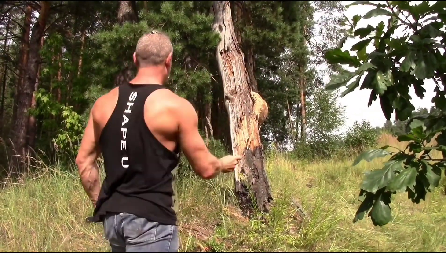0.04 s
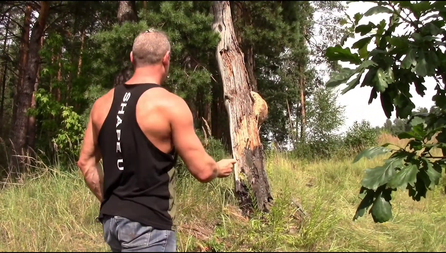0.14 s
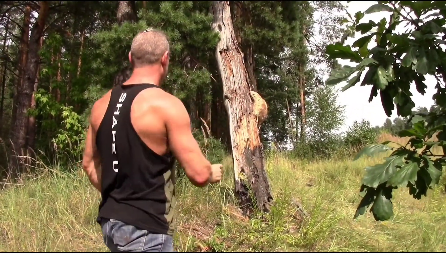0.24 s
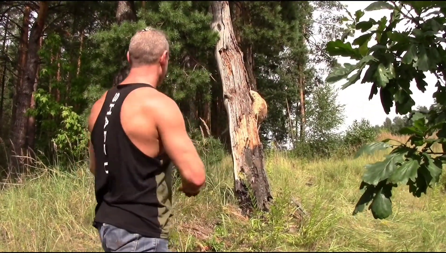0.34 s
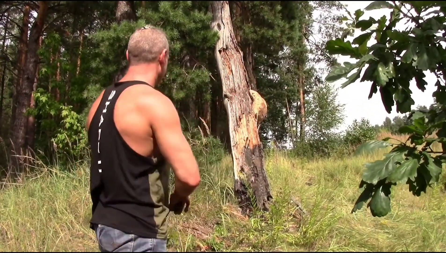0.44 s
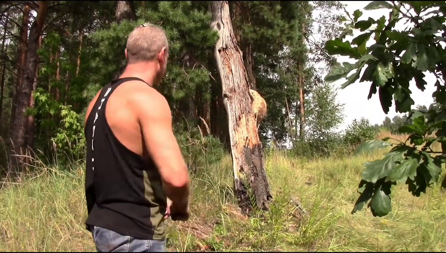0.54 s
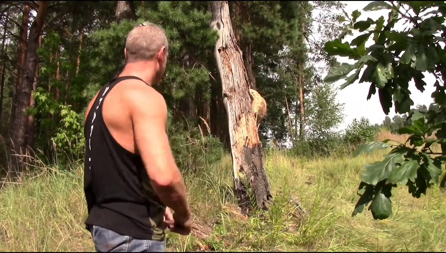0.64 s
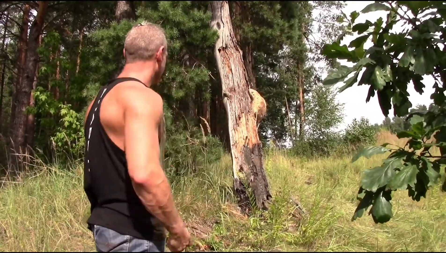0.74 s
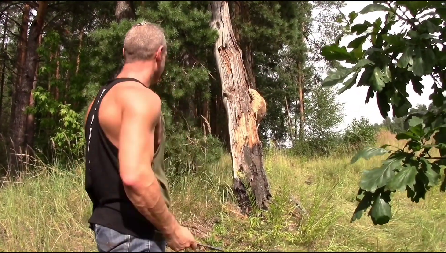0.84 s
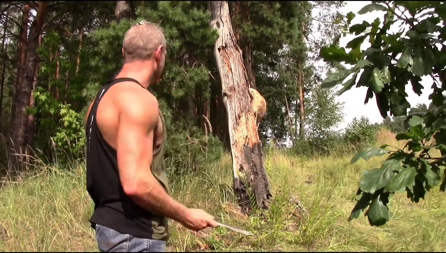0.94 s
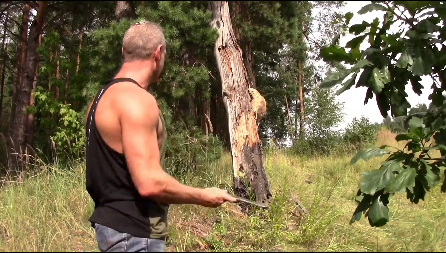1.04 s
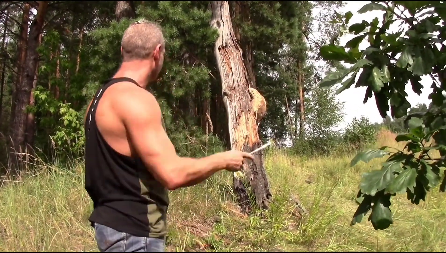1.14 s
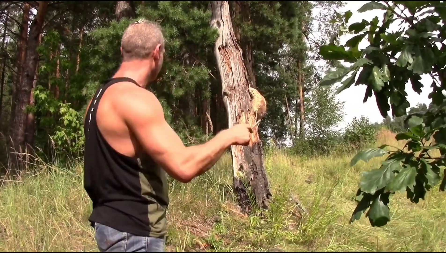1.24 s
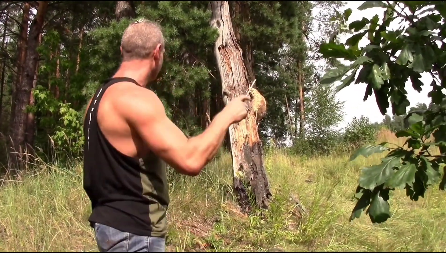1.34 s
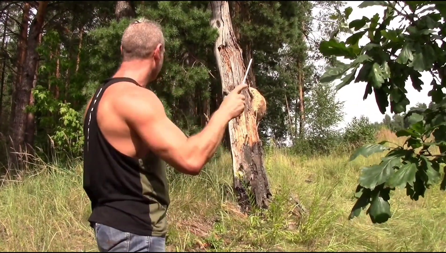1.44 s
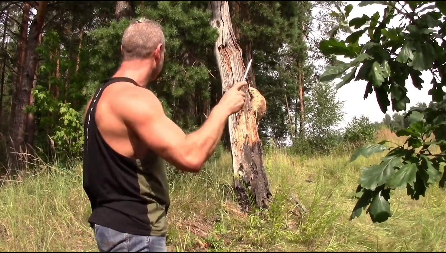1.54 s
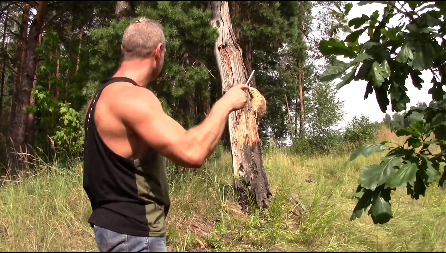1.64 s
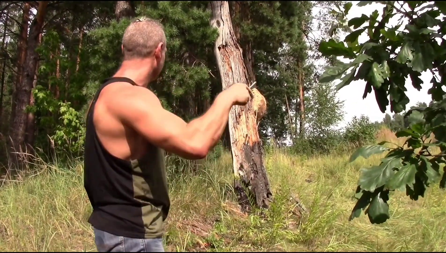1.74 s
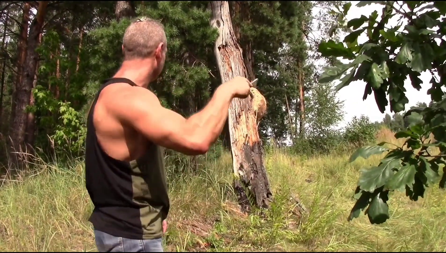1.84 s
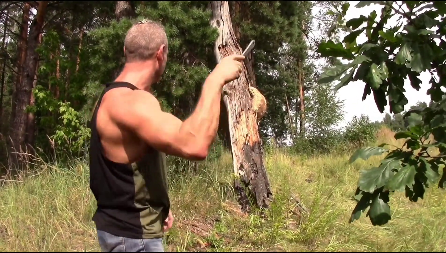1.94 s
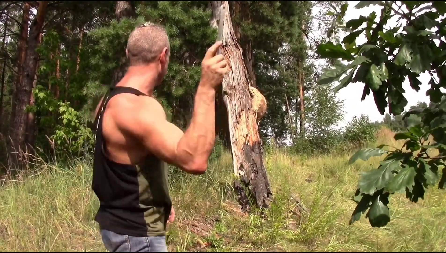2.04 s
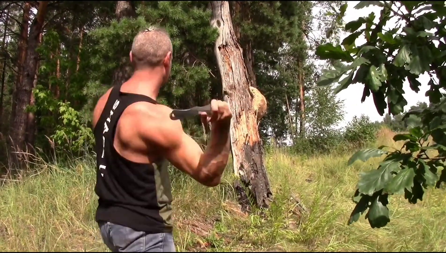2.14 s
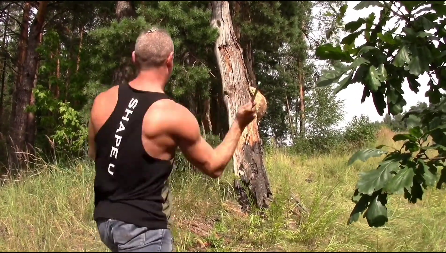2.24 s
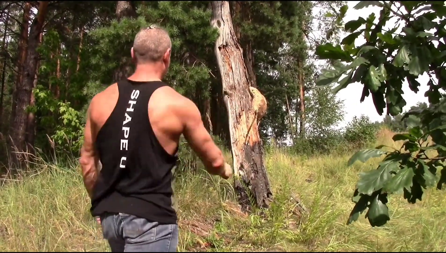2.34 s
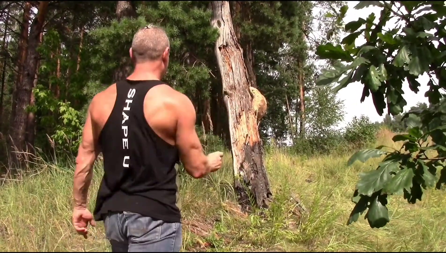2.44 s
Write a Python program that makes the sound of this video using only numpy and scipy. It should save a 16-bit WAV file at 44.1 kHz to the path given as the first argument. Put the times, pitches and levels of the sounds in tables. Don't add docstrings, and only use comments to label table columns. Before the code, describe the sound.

Brief blade ring at release, then a hard knife hit in dry wood with splitting fibres and slight tree echo; later clicking, knocking sheath draw, soft cloth and grass movement, outdoors in light wind, closely miked.

```python
import sys
import numpy as np
from scipy import signal
from scipy.fft import rfft, irfft
from scipy.io import wavfile
from scipy.ndimage import uniform_filter1d

SR = 44100
rng = np.random.default_rng(int(sys.argv[2]) if len(sys.argv) > 2 else 0)


def rack_gain(trim_db):
    fader = np.asarray(trim_db, float)
    return 10 ** (fader / 20)


def file_out(sig):
    cols = np.atleast_2d(sig).T
    lim = np.clip(cols, -1, 1)
    pcm = np.round(lim * 32767).astype(np.int16)
    wavfile.write(sys.argv[1], SR, pcm)


N = 110250

# frequency in Hz, level in dB per Hz.
WIND_COLOUR = [(30, -28), (70, -16), (220, -6.5), (400, -4.5), (850, -11), (1600, -20.5), (4000, -29.5),
               (7600, -29.5), (10500, -36.5), (15600, -38)]
# time in seconds, level in dB.
WIND_GUSTS = [
    (0.0, -50),
    (0.668, -51.5),
    (0.87, -52.5),
    (1.93, -57),
    (2.18, -55),
    (2.4, -56.5),
    (2.5, -54.5),
]
# frequency in Hz, side over mid in dB.
WIND_WIDTH = [(30, -14), (180, -14), (550, -16.5), (1650, -8.5), (4000, -5), (6000, -16), (8000, -5.5),
              (13000, -5.5), (14800, -10)]
# frequency in Hz, decay by 60 dB in seconds.
TREES_DECAY = [(150, 0.25), (400, 0.3), (800, 0.32), (1200, 0.49), (2000, 0.34), (3500, 0.21), (8000, 0.12)]
# frequency in Hz, level in dB.
TREES_COLOUR = [(200, -16), (400, -7), (800, -15.5), (1150, -22), (1600, -17), (2500, -23.5), (4000, -16),
                (8000, -7.5)]
# delay in seconds, level in dB.
TRUNK_ECHOES = [
    (.056, -39),
    (0.077, -46.5),
    (0.107, -44.5),
    (.138, -69),
]
# frequency in Hz, side over mid in dB.
NEAR_WIDTH = [(300, -36.5), (1200, -28), (3000, -18.5), (6000, -26), (8200, -13.5), (12000, -20)]
# middle in seconds, half length in seconds, level in dB, low and high edge in Hz.
RUSTLES = [(0.008, .018, -52.5, 400, 2800), (0.105, 0.017, -50, 1300, 3560), (.006, 0.018, -57, 4000, 9500),
           (0.061, .012, -63, 4800, 7500), (0.115, 0.052, -59.5, 3300, 8000),
           (0.416, 0.054, -70, 4530, 11900), (0.419, 0.0075, -58.5, 1880, 2440),
           (0.819, 0.0067, -58, 1200, 2600), (0.52, 0.42, -68, 4300, 10400),
           (0.91, 0.24, -67.5, 2980, 7900), (2.072, .04, -63, 4200, 11200),
           (2.176, 0.023, -65.5, 2960, 13700), (2.313, 0.12, -69, 5400, 12400),
           (2.49, 0.043, -59, 900, 8650)]
# time in seconds, level in dB.
LUNGE_SWELL = [
    (2.21, -93),
    (2.228, -58),
    (2.26, -45.5),
    (2.36, -53),
    (2.41, -53.5),
    (2.455, -53),
    (2.5, -53),
]
# time in seconds, level in dB, pitch in Hz, width in Hz.
TICKS = [(.0125, -43, 585, 252), (0.0143, -51.5, 1820, 400), (0.0969, -42.5, 347, 200),
         (0.1038, -40, 1210, 350), (.1085, -43, 780, 300), (0.1143, -50, 358, 250),
         (0.4225, -36.5, 7600, 6000), (0.43, -39.5, 6940, 4960), (.512, -42, 7700, 5000),
         (0.559, -45, 7260, 6130), (0.575, -44.5, 7850, 6000), (0.6594, -37.5, 2600, 4030),
         (0.6584, -30.5, 5600, 8000), (0.685, -46, 10900, 5030), (0.7173, -34.5, 6500, 7000),
         (.7175, -45, 12500, 7000), (0.728, -35, 6700, 6000), (0.7393, -37, 11000, 8000),
         (0.7422, -42, 4000, 6000), (0.756, -28.5, 6370, 7000), (0.7473, -35, 10000, 6000),
         (0.7792, -35, 6000, 6000), (.7835, -46, 12400, 7000), (0.7855, -38, 5000, 4000),
         (.7918, -33, 5460, 5000), (.8065, -41, 6000, 5000), (0.8379, -41.5, 7350, 6000),
         (0.9292, -55, 7640, 5000), (1.107, -52, 4900, 3000), (1.218, -44, 2270, 2020),
         (1.926, -46.5, 7760, 7000), (2.153, -43.5, 8000, 8000), (2.153, -46, 500, 350),
         (2.153, -53.5, 2200, 700), (2.153, -54, 12500, 7000), (2.09, -52, 13100, 7000),
         (2.164, -54, 1060, 300), (2.187, -37, 930, 740), (2.186, -47, 1670, 1000), (2.188, -48, 690, 500),
         (2.192, -48, 7000, 4000), (2.253, -52, 604, 900), (2.305, -55, 9800, 4000),
         (2.3185, -53, 12000, 7900)]
# time in seconds, level in dB.
DRAW_SWELL = [
    (.69, -60),
    (.715, -57),
    (.745, -50.5),
    (.768, -47),
    (.785, -46),
    (.81, -54.5),
    (.835, -67),
]
# middle in Hz, width in Hz, level in dB.
SHEATH_BANDS = [(750, 570, -0.5), (1680, 310, -5.5), (2600, 350, -6.5), (5300, 1150, 2), (6060, 1000, 0.5),
                (8800, 3500, 0), (11500, 4300, -3)]
# time in seconds, level in dB.
SHEATH_KNOCKS = [
    (.7168, -34),
    (.7425, -41),
    (.7625, -33.5),
    (.7655, -37),
    (.785, -56),
    (.7895, -34),
    (.8025, -35),
    (.806, -44),
]
# frequency in Hz, level in dB, decay by 60 dB in seconds.
SHEATH_MODES = [(700, -2.5, 0.02), (806, -2, 0.02), (1750, -13.5, 0.021), (2210, -17, 0.032)]
# frequency in Hz, level in dB, decay by 60 dB in seconds.
THROWN_MODES = [(2760, -16, .12), (6191, 0, .06), (8436, -4, .04), (10950, -17, .03), (12500, -28, .025)]
# frequency in Hz, level in dB, decay by 60 dB in seconds.
DRAWN_MODES = [(2800, -17.5, 0.22), (4320, -14, 0.036), (6480, -0.5, 0.18)]
# time in seconds, level in dB, rise in seconds,
# lean toward low modes in dB per octave, time it rings free in seconds.
THROWN_FLICKS = [
    (0.0, -29.5, 0.01, -7.5, .022),
    (0.056, -46.5, 0.0068, 5, 0.027),
    (2.488, -49.5, 0.01, -25, .03),
]
DRAWN_FLICKS = [
    (0.66, -50.5, .001, 2.5, 0.026),
    (0.974, -84, 0.0072, 38.3, 0.059),
]
# frequency in Hz, level in dB per Hz.
BARK_COLOUR = [(300, -30), (550, -4), (950, 0.5), (1700, -2), (2100, -8), (3400, -12), (5000, -29)]
# time in seconds, level in dB, lean toward low modes in dB per octave.
BITES = [
    (0.1972, -45.4, -18.1),
    (0.1986, -12.0, 11.9),
    (0.2006, -14.4, -2.5),
    (0.2023, -20.9, -8.4),
    (0.2038, -16.9, 6.8),
    (0.2069, -22.5, 1.3),
    (0.2161, -41.1, -9.9),
]
# frequency in Hz, level in dB, decay by 60 dB in seconds.
CUT_MODES = [(792, -9.9, .045), (1104, -1.3, .027), (1157, .5, .043), (1487, -7.5, .042), (1640, -20, .04),
             (1823, -12.9, .05), (2286, -1, .042), (2468, .7, .02), (3150, 4.4, .008), (3640, -15, .04),
             (3717, 1.2, .006)]
# time in seconds, level in dB, lean toward low modes in dB per octave.
SHOVES = [
    (0.199, -7.7, -30.6),
    (0.202, -0.6, 0.2),
    (0.2088, 6.6, -15.1),
    (0.214, -2.9, -27.5),
]
# frequency in Hz, level in dB, decay by 60 dB in seconds.
TRUNK_MODES = [(221.0, -2.1, 0.055), (215.0, -9.7, 0.048), (361.0, -15.6, 0.047), (346.0, -28.8, 0.018),
               (673.0, -39.1, 0.06), (492.0, -32.4, 0.1)]
# frequency in Hz, level in dB per Hz.
CRACK_COLOUR = [(3000, -11), (4000, -36.5), (4700, -14), (7000, -15), (10000, -24.5), (15600, -32.5)]
# time in seconds, level in dB.
SWAYS = [
    (.228, -34),
    (.2555, -27),
    (.2765, -41),
    (.306, -41),
    (.336, -49.5),
]
# frequency in Hz, level in dB, decay by 60 dB in seconds.
SWAY_MODES = [(338, -5, .045), (372, -4, 0.065), (440, -11, .03), (604, -6, 0.039), (1120, -15, 0.035)]

CRACK_S = .1953


def evened(x):
    return x / np.sqrt(np.mean(x ** 2) + 1e-20)


def read(points, hz):
    f, value = np.transpose(points)
    return np.interp(np.log(hz + 1), np.log(f + 1), value)


def level(points):
    s, db = np.transpose(points)
    return rack_gain(np.interp(np.arange(N) / SR, s, db, left=-200, right=-200))


def add(mix, s, sound):
    part = mix[round(s * SR):][:len(sound)]
    part += sound[:len(part)]


def train(events):
    out = np.zeros(N)
    for s, db in events:
        out[round(s * SR)] = rack_gain(db)
    return out


def fade_in(sound, rise_s):
    return sound * np.minimum(np.arange(len(sound)) / SR / rise_s, 1)


def colour(x, points):
    gain = rack_gain(read(points, np.fft.rfftfreq(len(x), 1 / SR)))
    return irfft(rfft(x) * gain, len(x))


def band(x, low_hz, high_hz):
    edges = [low_hz, min(high_hz, SR / 2.1)]
    return signal.sosfilt(signal.butter(2, edges, "band", fs=SR, output="sos"), x)


def ring(modes, lean_db=0, length=.4, pivot_hz=6300):
    t = np.arange(0, length, 1 / SR)
    out = np.zeros(len(t))
    for k, (hz, db, t60) in enumerate(modes):
        fall = rack_gain(db - 60 * t / t60 - lean_db * np.log2(hz / pivot_hz))
        out += (-1) ** k * fall * np.sin(2 * np.pi * hz * t)
    return out


def jolts(modes, events, pivot_hz, push_s):
    out, keep = np.zeros(N), np.exp(-1 / SR / push_s)
    for s, db, lean_db in events:
        add(out, s, rack_gain(db) * ring(modes, lean_db, pivot_hz=pivot_hz))
    return signal.lfilter([1 - keep], [1, -keep], out)


def grains(per_s, spread_db, share):
    hits = rng.random(N) < per_s / SR
    size = rack_gain(spread_db * np.minimum(rng.exponential(1, N), 4))
    slips = hits * size * rng.choice([-1, 1], N)
    return evened((1 - share) * evened(slips) + share * rng.standard_normal(N))


def wind():
    frames, hz = N // 256 + 5, np.fft.rfftfreq(1024, 1 / SR)
    a, b, c, d, patches = rng.standard_normal((frames, 513, 5)).T
    patches = evened(uniform_filter1d(uniform_filter1d(patches, 10, 0), 10, 1))
    s, db = np.transpose(WIND_GUSTS)
    gust_db = np.interp(np.arange(frames) * 256 / SR, s, db - db.mean())
    follow = read([(100, 0.67), (900, 1.0), (6000, 0.89)], hz)[:, None]
    z = np.array([a + 1j * b, (c + 1j * d) * rack_gain(read(WIND_WIDTH, hz))[:, None]])
    z *= rack_gain(read(WIND_COLOUR, hz)[:, None] + 1.2 * patches + follow * gust_db)
    pair = signal.istft(z, nperseg=1024, noverlap=768)[1][:, :N]
    return rack_gain(-53) * pair / np.std(pair[0])


def trees(x):
    taps = np.zeros((2, SR // 2))
    at = np.arange(500, SR // 2 - 20, 20) + rng.integers(0, 20, (2, (SR // 2 - 501) // 20))
    np.put_along_axis(taps, at, rng.choice([-1., 1.], at.shape), 1)
    hz, t, z = signal.stft(taps, SR, nperseg=256)
    fall = rack_gain(-60 * t / read(TREES_DECAY, hz)[:, None])
    even_fall = fall / np.linalg.norm(fall, axis=1)[:, None]
    shape = even_fall * rack_gain(read(TREES_COLOUR, hz)[:, None])
    tail = signal.istft(z * shape, SR, nperseg=256)[1] * np.sqrt(20 / 128)
    for s, db in TRUNK_ECHOES:
        tail[0, round(s * SR)] += rack_gain(db)
    return signal.fftconvolve(x[None], tail, axes=1)[:, :N]


def rustles():
    crackle, t = grains(2500, 4.5, 0.33), np.arange(N) / SR
    out = np.zeros(N)
    for s, half, db, low_hz, high_hz in RUSTLES:
        out += rack_gain(db) * evened(band(crackle, low_hz, high_hz)) * np.exp(-((t - s) / half) ** 2)
    shuffle = evened(band(grains(388, 1.8, 0.37), 220, 500))
    return out + rack_gain(-1.0) * level(LUNGE_SWELL) * shuffle


def ticks():
    out, t = np.zeros(N), np.arange(0, .025, 1 / SR)
    fuzzes = rng.standard_normal((len(TICKS), len(t)))
    for (s, db, hz, width), fuzz in zip(TICKS, fuzzes):
        tail = 0.3 * band(fuzz, hz / 1.72, hz * 1.29) * np.exp(-t / 0.0044)
        swell = 2 * (1 - np.exp(-3.0 * t * width)) * np.exp(-t * width)
        add(out, s, rack_gain(db) * (swell * np.sin(2 * np.pi * hz * t) + tail))
    return out


def draw():
    slips, scrape = grains(1800, 3.6, .45), np.zeros(N)
    for hz, width, db in SHEATH_BANDS:
        scrape += rack_gain(db) * evened(band(slips, hz - width / 2, hz + width / 2))
    hollow = fade_in(ring(SHEATH_MODES, length=.1), 0.0014)
    knocks = signal.oaconvolve(train(SHEATH_KNOCKS), hollow)[:N]
    return level(DRAW_SWELL) * evened(scrape) + knocks


def steel():
    out, grip_t60 = np.zeros(N), .018
    for modes, flicks in ((THROWN_MODES, THROWN_FLICKS), (DRAWN_MODES, DRAWN_FLICKS)):
        for s, db, rise, lean_db, free in flicks:
            tone = ring(modes, lean_db)
            t = np.arange(len(tone)) / SR
            mute = rack_gain(db - 60 * np.maximum(t - free, 0) / grip_t60)
            add(out, s, mute * fade_in(tone, rise))
    return out


def bark():
    t = np.maximum(np.arange(N) / SR - CRACK_S, 0)
    swell = rack_gain(-33 - 60 * t / .13) * np.minimum(t / .012, 1)
    return swell * evened(colour(grains(1500, 3.5, 0.52), BARK_COLOUR))


def crack():
    rise_s, snap_t60, creak_db, creak_t60 = .0052, 0.024, -17.5, 0.11
    t = np.arange(N) / SR - CRACK_S - rise_s
    fall = rack_gain(-60 * np.abs(t) / snap_t60) + rack_gain(creak_db - 60 * np.abs(t) / creak_t60)
    burst = np.where(t < 0, np.maximum(1 + t / rise_s, 0) ** 1.6, fall)
    splinters = band(grains(4500, 3.1, 0.72), 2900, 14001)
    return rack_gain(-28) * burst * evened(colour(splinters, CRACK_COLOUR))


def thud():
    bite = jolts(CUT_MODES, BITES, pivot_hz=1500, push_s=.0001)
    shove = jolts(TRUNK_MODES, SHOVES, pivot_hz=350, push_s=.0004)
    rock = signal.oaconvolve(train(SWAYS), fade_in(ring(SWAY_MODES), 0.0087))[:N]
    return rack_gain(0.63) * (bite + shove) + rock + crack()


def scene():
    hit, small = thud() + bark(), ticks() + draw() + rustles()
    cut = signal.butter(3, 128, "high", fs=SR, output="sos")
    hit, small = signal.sosfiltfilt(cut, hit), signal.sosfilt(cut, small)
    hit = hit * np.clip((np.arange(N) / SR - CRACK_S) / .003, 0, 1)
    wet, air = trees(hit + 0.63 * small), wind()
    near = hit + small + steel()
    mid = near + wet[0] + air[0]
    side = colour(np.roll(near, 9) + 3.7 * wet[1], NEAR_WIDTH) + air[1]
    return np.array([mid + side, mid - side])


def roll_off(x):
    return signal.sosfilt(signal.butter(12, 15700, fs=SR, output="sos"), x)


def record(dry):
    edge = signal.firwin(301, 15620, window=("kaiser", 9), fs=SR)
    mix = signal.oaconvolve(dry, edge[None], "same")
    return roll_off(mix)


dry = scene()
out = record(dry)
file_out(out)
```